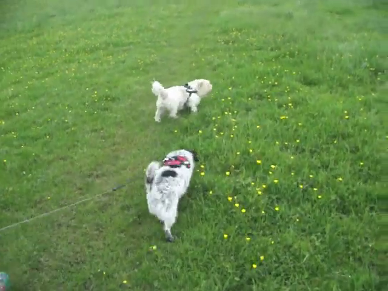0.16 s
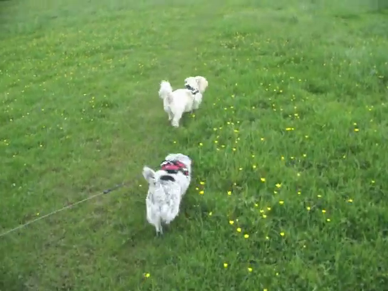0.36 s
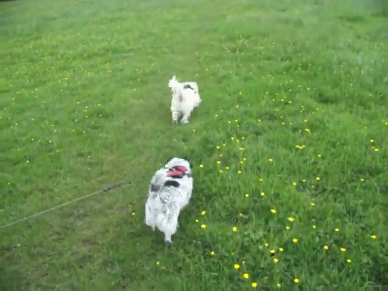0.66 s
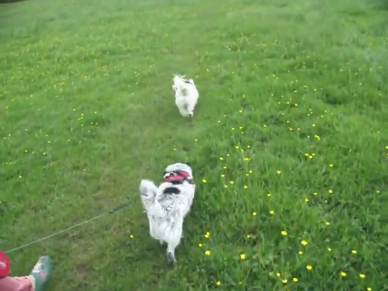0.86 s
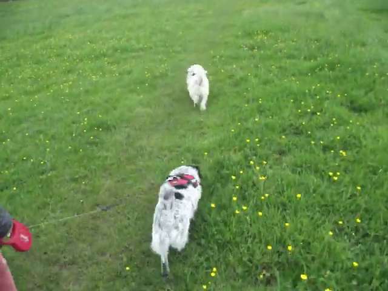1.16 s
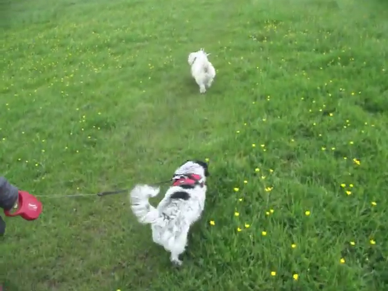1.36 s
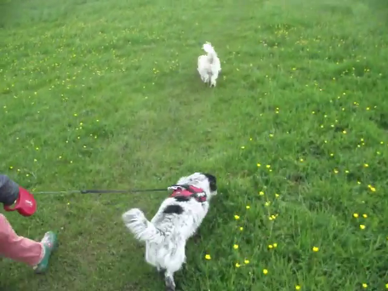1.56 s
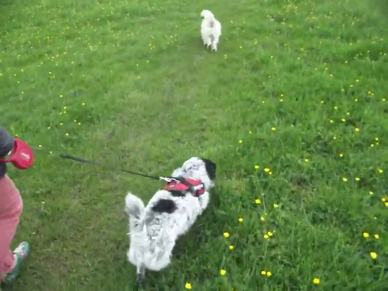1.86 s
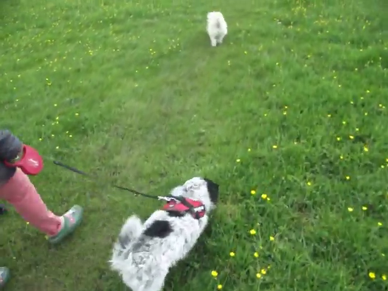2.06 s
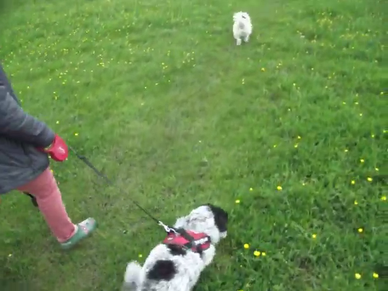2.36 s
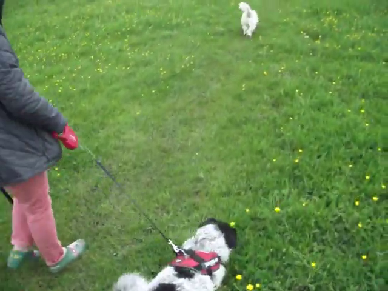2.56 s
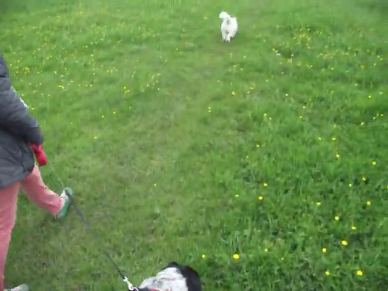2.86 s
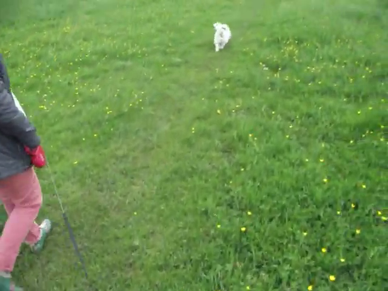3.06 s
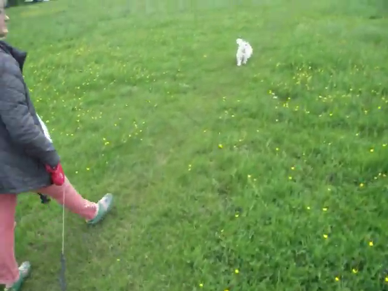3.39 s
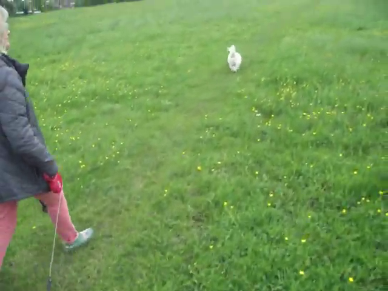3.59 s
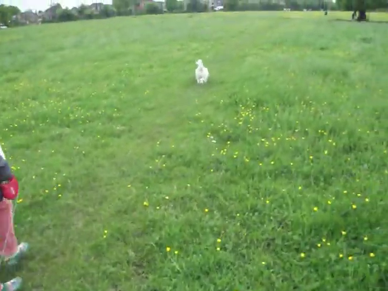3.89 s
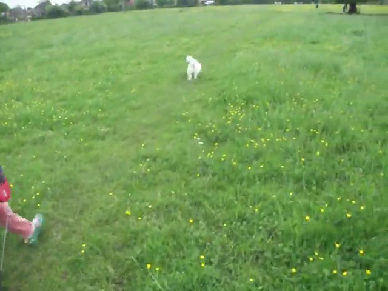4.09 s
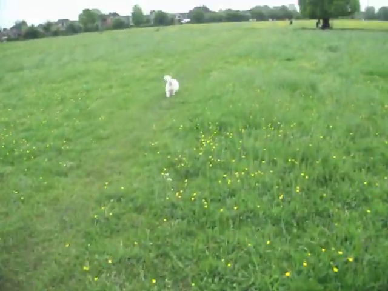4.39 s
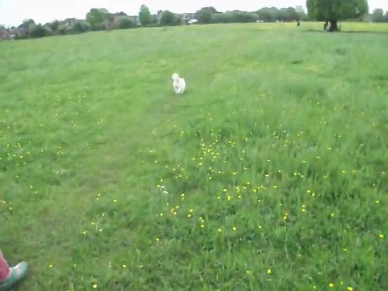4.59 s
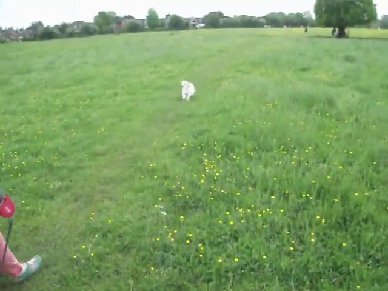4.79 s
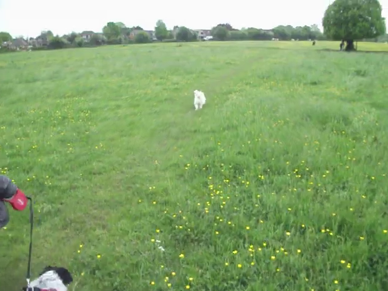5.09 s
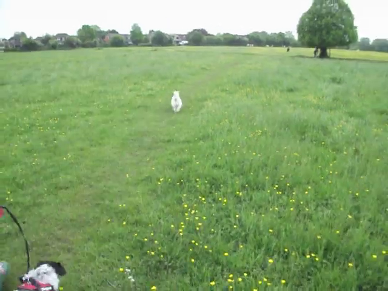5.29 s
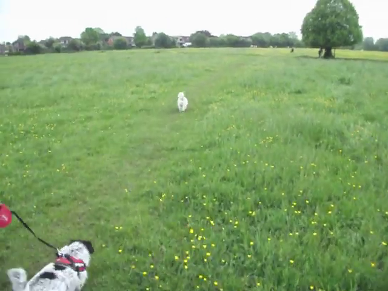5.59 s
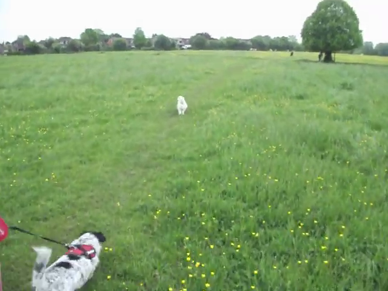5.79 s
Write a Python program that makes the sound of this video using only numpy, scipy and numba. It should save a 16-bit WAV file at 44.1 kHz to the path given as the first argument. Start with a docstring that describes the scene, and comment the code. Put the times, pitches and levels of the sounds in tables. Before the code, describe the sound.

A steady hiss with a faint whistle runs throughout, heard through a small hand-held microphone in an open field. Wind buffets it hard during the first second, with a low thump at about 0.3 seconds. A retractable leash reel gives a run of short, high, even creaks from 0.7 to 1.3 seconds. A sole scuffs at 1.5 seconds, and soft footfalls on grass come now and then. From 1.6 to 2.7 seconds the camera case rubs under the hand, with sharp, overloaded clicks, three dull knocks, a brief rumble and a few more creaks. Further rubs and two loud clicks come around 3.5 seconds. The reel creaks again from 3.7 to 4.9 seconds, with a quick flurry and a click near 4.1. Faint steps follow, and the low wind rumble swells again from about 5.6 seconds to the end.

```python
"""Wind buffets the microphone of a small hand-held camera on a walk with dogs across a grassy field.
Under the gusts a steady hiss whistles faintly in the microphone port; feet fall softly on the turf
and a sole scuffs once. A leash reel creaks once a turn, in short, even runs. Up close, the camera case
rubs and rumbles under the hand, takes a few dull knocks and gives clicks that overload the recorder."""
import sys
import numpy as np
from scipy import signal
from scipy.fft import rfft, irfft, next_fast_len
from scipy.io import wavfile
from scipy.ndimage import uniform_filter1d
from numba import njit

SR = 44100
rng = np.random.default_rng(int(sys.argv[2]) if len(sys.argv) > 2 else 0)


def int16_out(signal):
    """Quantize to a 16-bit WAV file."""
    q = np.round(np.clip(np.atleast_2d(signal).T, -1, 1) * 32767)
    wavfile.write(sys.argv[1], SR, q.astype(np.int16))


N = 261954
TIME = np.arange(N) / SR

# tone of the case when it is rubbed or rattles: freq_hz, gain_db
CASE_COLOUR = [(300, -31), (1000, -25.5), (1400, -18.5), (1750, -9.5), (2000, -8), (2550, 0.5), (2900, 0),
               (3300, -13.5), (3650, -20.5), (4200, -23.5), (5400, -47.5)]


def undb(db):
    """Decibels to gain."""
    return 10 ** (np.asarray(db) / 20)


def unit(x):
    """Scale to rms 1."""
    return x / np.sqrt(np.mean(x ** 2))


def add(out, start_s, sound):
    """Mix a sound in at its cue."""
    i = max(int(start_s * SR), 0)
    out[i:i + len(sound)] += sound[:max(N - i, 0)]


def colour(x, spectrum):
    """Equalise along (freq_hz, gain_db) points, rolling off an octave above the last."""
    hz, db = np.transpose(spectrum)
    size = next_fast_len(len(x))
    freqs = np.maximum(np.fft.rfftfreq(size, 1 / SR), 1)
    gain = undb(np.interp(np.log(freqs), np.log(hz), db)) / (1 + (freqs / (2 * hz[-1])) ** 4)
    return irfft(rfft(x, size) * gain, size)[:len(x)]


def noise(spectrum, count=N):
    """White noise coloured by (freq_hz, gain_db) points."""
    return colour(rng.standard_normal(count), spectrum)


def ring(push, modes):
    """Pass a push through parallel resonances (pitch_hz, width_hz, gain_db)."""
    return sum(undb(db) * signal.lfilter(*signal.iirpeak(hz, hz / width, fs=SR), push)
               for hz, width, db in modes)


def wander(rate_hz):
    """Smooth drift at rms 1: random levels, each held briefly, slewed twice."""
    hold = int(SR / rate_hz)
    levels = np.repeat(rng.standard_normal(N // hold + 1), hold)
    return unit(uniform_filter1d(uniform_filter1d(levels, hold), hold)[:N])


def slips(count, rate_hz, spread_db):
    """Friction: tiny slips of uneven size at random moments."""
    ticks = (rng.random(count) < rate_hz / SR) * rng.choice([-1, 1], count)
    return ticks * undb(spread_db * rng.standard_normal(count))


def steadied(x, span_s):
    """Even out the slow swells of a noise, leaving rms near 1."""
    return x / np.sqrt(uniform_filter1d(x ** 2, int(span_s * SR)) + np.mean(x ** 2) / 20)


def swishes(cues, spectrum, count=8192):
    """Grainy swells of friction, one for each (start_s, length_s, level_db)."""
    out = np.zeros(N)
    for start_s, length_s, db in cues:
        friction = slips(count, rate_hz=2100, spread_db=2)
        grain = unit(colour(friction, spectrum))[:int(length_s * SR)]
        add(out, start_s, grain * signal.windows.tukey(len(grain), .5) * undb(db))
    return out


def hiss(level_db=-31.33):
    """An even bed of air and grass, with a faint whistle from the microphone port."""
    # tone of the field's hiss: freq_hz, gain_db
    air_colour = [(100, 7), (300, 0.5), (550, 0), (900, 3), (1350, -0.5), (2000, 3), (2800, 6.5),
                  (3200, 7.5), (3600, -20), (4200, -59.5), (5400, -22.5), (6500, -25.5)]
    # resonances of the port: pitch_hz, width_hz, gain_db
    port_modes = [(1790, 104, 7.5), (2476, 134.5, 19)]
    whistle = ring(rng.standard_normal(N), port_modes)
    return unit(noise(air_colour) + whistle) * undb(level_db)


def wind_and_rumble():
    """Wind gusts and deep rumble swells, one from handling, over a wandering breeze; strong gusts also flutter."""
    # breeze between the gusts: time_s, level_db
    breeze = [(1.1, -35), (1.17, -39), (1.48, -33.5), (2.25, -35.5), (2.44, -29), (2.47, -34), (3.5, -39),
              (3.59, -34), (4.12, -39.5), (4.21, -32), (4.88, -42.5), (4.95, -32.5), (5.4, -39.5),
              (5.55, -39)]
    # low swells on the microphone, wind gusts and deep rumble swells, the one at 2.38 s from handling: #
    # crest_s, half_length_s, buffet_db, rumble_db
    swells = [(0.051, 0.024, -25, -28), (0.133, 0.027, -20, -24.5), (0.316, 0.078, -18, -19),
              (0.67, 0.02, -17.5, -16.5), (0.902, 0.09, -18.5, -17.5), (2.38, 0.068, -46.5, -23.5),
              (4.27, 0.023, -33, -53), (5.0, 0.03, -37, -27.5), (5.645, 0.11, -46, -20.5),
              (5.917, 0.049, -37, -12)]
    # tone of each layer, deepest first: freq_hz, gain_db
    rumble_colour = [(5, 4.5), (14, 2), (30, 2.5), (48, -4.5), (65, -13.5), (100, -32.5)]
    buffet_colour = [(35, -15.5), (58, 0.5), (80, 0), (110, -7.5), (150, -15), (220, -31.5), (400, -48)]
    flutter_colour = [(80, -15), (150, 8.5), (220, -3.5), (330, -15.5), (500, -28), (900, -37)]
    breeze_db = np.interp(TIME, *np.transpose(breeze)) + 1.5 * wander(rate_hz=12)
    buffet_gain, rumble_gain = undb(breeze_db - 2), undb(breeze_db + 8)
    for crest_s, half_s, buffet_db, rumble_db in swells:
        swell = np.exp(-((TIME - crest_s) / half_s) ** 2)
        buffet_gain += undb(buffet_db) * swell
        rumble_gain += undb(rumble_db) * swell
    rumble = steadied(noise(rumble_colour), span_s=0.076) * rumble_gain
    buffet = steadied(noise(buffet_colour), span_s=0.05) * buffet_gain
    flutter = steadied(noise(flutter_colour), span_s=0.13)
    drive_db = 20 * np.log10(buffet_gain)
    flutter_db = 1.57 * drive_db - 4.5 + 2 * wander(rate_hz=45)  # swells faster than the buffeting
    return rumble + buffet + flutter * undb(flutter_db)


def puffs():
    """A single eddy builds up pressure on the diaphragm, then flips to a suction that fades."""
    # hard puffs of wind: flip_s, level_db, build_s
    cues = [(0.123, -22, 0.017), (0.325, -8, 0.0013), (0.676, -18, 0.009), (2.429, -17.5, 0.0057),
            (3.694, -22, 0.017), (5.672, -14, 0.011)]
    out = np.zeros(N)
    for flip_s, db, build_s in cues:
        out += undb(db) * np.exp(-np.abs(TIME - flip_s) / build_s) * np.tanh((flip_s - TIME) / 0.001)
    return out


def footsteps():
    """Soles brush softly into the turf."""
    # footfalls: start_s, length_s, level_db
    cues = [(1.443, 0.027, -35), (1.93, 0.11, -37.5), (3.545, 0.041, -38.5), (3.88, 0.062, -40),
            (5.32, 0.031, -36.5), (5.63, 0.035, -36.5)]
    # muffled tone of turf: freq_hz, gain_db
    turf_colour = [(120, -18.5), (250, 0.5), (400, -3), (600, -12.5), (1200, -6.5), (2500, -20.5)]
    return swishes(cues, turf_colour)


def scuff(start_s, scrape_db, scrape_decay_s, hollow_db, hollow_decay_s, count=12000):
    """A sole's scrape dies away; its firm start rings two hollow resonances."""
    # tone of the scrape: freq_hz, gain_db
    scrape_colour = [(200, -19), (550, -13.5), (800, -12), (1100, -14), (1350, -12), (1560, -4.5),
                     (1900, -14.5), (2280, -2.5), (2600, -10), (3100, -11.5), (3600, -23.5), (5000, -51.5)]
    # hollow ring at its start: pitch_hz, width_hz, gain_per_pass_db
    hollow_modes = [(1570, 180, -1), (2220, 240, -7)]
    out, t = np.zeros(N), TIME[:count]
    push = slips(count, rate_hz=6000, spread_db=4)
    scrape = unit(colour(push, scrape_colour))
    scrape *= np.minimum(t / 0.013, 1) * np.exp(-t / scrape_decay_s)
    hollow = steadied(ring(ring(push, hollow_modes), hollow_modes), span_s=0.0099)
    hollow *= np.minimum(t / 0.0018, 1) * np.exp(-t / hollow_decay_s)
    add(out, start_s - .008, scrape * undb(scrape_db))  # the sole grazes just before it bites
    add(out, start_s, hollow * undb(hollow_db))
    return out


def rubs():
    """The hand slides on the case in short, grainy strokes."""
    # strokes: start_s, length_s, level_db
    cues = [(1.699, 0.078, -17), (1.732, 0.024, -11), (1.811, 0.078, -22.5), (2.282, 0.13, -27.5),
            (2.408, 0.027, -26.5), (2.62, 0.058, -27), (3.328, 0.054, -23.5), (3.418, 0.039, -28.5),
            (3.505, 0.052, -27.5)]
    return swishes(cues, CASE_COLOUR)


def knocks(count=2048):
    """Soft bumps ring the low modes of the camera body."""
    # bumps: start_s, peak_db, contact_s
    cues = [(2.109, -9.5, 0.00026), (2.3988, -3.5, 0.00022), (2.6339, -6, 0.00022)]
    # body modes: pitch_hz, width_hz, gain_db
    body_modes = [(203, 320, 3), (403, 56, 0), (730, 120, 5), (1180, 78, 6.5)]
    out, t = np.zeros(N), TIME[:count]
    for start_s, db, contact_s in cues:
        thud = ring(t * np.exp(-t / contact_s), body_modes)
        add(out, start_s, -thud / np.abs(thud).max() * undb(db))
    return out


def reel_runs(turn_s=0.0825, lag_s=0.022, settle=0.33, length_s=0.013):
    """Creak cues from a leash reel unwinding: one a turn, slow at first, then at an even beat."""
    # runs of the reel: start_s, count, first_force_db, last_force_db
    runs = [(0.729, 7, -14.5, -14.5), (1.672, 3, -12, -24), (3.691, 4, -16, -15.5), (4.399, 6, -10, -16.5)]
    cues = []
    for start_s, count, first_db, last_db in runs:
        for k, force_db in enumerate(np.linspace(first_db, last_db, round(count))):
            cues.append((start_s, force_db, length_s))
            start_s += turn_s + lag_s * settle ** k
    return cues


def creaks(pitch_hz=2816, sag_hz_per_db=19, count=2048):
    """Each creak is a swell of quick slips: one wavering mode sings over a dry rasp."""
    # firm accents, a quick flurry and a few single creaks: start_s, force_db, length_s
    accents = [(0.022, -16, 0.022), (0.693, -12, 0.002), (1.942, -5.5, 0.013), (1.969, -15.5, 0.026),
               (3.957, -5.5, 0.0097), (3.996, -9, 0.011), (4.027, -7.5, 0.013), (4.061, -3, 0.014),
               (4.079, -16, 0.012), (4.107, -8.5, 0.016), (4.5038, -5, 0.0085)]
    # dry edge of a creak: freq_hz, gain_db
    rasp_colour = [(500, -30), (1300, -12), (1750, -3.5), (2000, -10.5), (2500, 6.5), (3350, -2.5),
                   (3650, -12), (4200, -13), (5400, -18.5)]
    out, t = np.zeros(N), TIME[:count]
    for start_s, force_db, length_s in reel_runs() + accents:
        hz = pitch_hz - sag_hz_per_db * force_db  # the firmer the creak, the lower it sings
        swell = np.sin(np.pi * np.minimum(t / length_s, 1)) * np.exp(-.8 * t / length_s)
        band = [(.75 * hz, -40), (.92 * hz, -3), (hz, 0), (1.08 * hz, -3), (1.22 * hz, -40)]
        mode = noise(band, count)
        mode /= np.sqrt(np.average(mode ** 2, weights=swell ** 2))
        rasp = unit(colour(slips(count, rate_hz=7600, spread_db=1.5), rasp_colour))
        # firm creaks sing, light ones are mostly rasp
        add(out, start_s, swell * (undb(force_db - 6.5) * mode + undb(0.35 * force_db - 16.5) * rasp))
    return out


def clicks(count=2048):
    """A snap cracks and briefly rings the case; a weak rattle trails it."""
    # snaps on the case: start_s, level_db, pitch_hz, t60_s
    cues = [(1.602, -9.5, 2630, 0.0095), (1.729, 4, 2790, 0.005), (1.7394, 2.5, 2690, 0.009),
            (1.7483, -7, 2540, 0.007), (1.76, -2.5, 2550, 0.0064), (1.8254, -9, 2550, 0.0061),
            (2.109, 6, 2490, 0.0038), (2.245, -5, 2660, 0.0054), (2.3305, 9.5, 2690, 0.02),
            (2.3728, 3, 2750, 0.0062), (2.3975, 4.5, 2255, 0.0095), (2.484, 2, 2660, 0.0068),
            (2.5063, -6, 2680, 0.013), (2.6584, -3, 2630, 0.0065), (3.4536, 10, 2710, 0.0085),
            (3.5393, 8, 2475, 0.0056), (4.0971, 3, 2744, 0.015), (4.4504, -7.5, 2770, 0.016),
            (5.687, -9.5, 2700, 0.012)]
    # first instant of a click: freq_hz, gain_db
    crack_colour = [(200, -24), (600, -16.5), (1200, -1), (2000, 4), (4000, -2.5), (5400, -9)]
    out, t = np.zeros(N), TIME[:count]
    for start_s, db, hz, t60_s in cues:
        envelope = np.exp(-np.log(1000) * t / t60_s) * (1 - np.exp(-t / 0.00077))
        tone = np.sin(2 * np.pi * hz * t) * envelope / envelope.max()
        crack = noise(crack_colour, count) * np.exp(-t / 0.0015)
        rattle = unit(noise(CASE_COLOUR, count)) * np.exp(-t / 0.0046)
        add(out, start_s, undb(db) * (tone + undb(-14) * crack + undb(-16.5) * rattle))
    return out


def scene():
    """Wind, field, feet, leash and handling meet at the one microphone."""
    close_up = creaks() + clicks() + rubs() + knocks()
    feet = footsteps()
    feet += scuff(1.502, scrape_db=-19, scrape_decay_s=0.072, hollow_db=-17.5, hollow_decay_s=0.024)
    return (wind_and_rumble() + puffs() + hiss() + close_up + feet)[None]


@njit
def follow(x, attack, release):
    """The limiter's envelope: it rises fast and falls slowly."""
    out, level = np.empty(len(x)), 0.
    for i in range(len(x)):
        level += (abs(x[i]) - level) * (attack if abs(x[i]) > level else release)
        out[i] = level
    return out


def record(dry, band_hz=5550, top_hz=16200,
           threshold_db=-8, attack_s=0.00064, release_s=0.021, lag_s=.0014):
    """A narrow-band input with a late limiter: loud clicks clip, and the hiss ducks after them."""
    # treble cut that softens the buzz of clipping: freq_hz, gain_db
    treble_cut = [(5200, 0), (6300, -7), (8200, -11), (11000, -4.5), (16000, -13.5)]
    x = signal.sosfilt(signal.ellip(8, .2, 80, band_hz, fs=SR, output="sos"), dry[0])
    envelope = follow(x, 1 / (attack_s * SR), 1 / (release_s * SR))
    late_envelope = np.interp(TIME - lag_s, TIME, envelope)
    limited = x / np.maximum(late_envelope / undb(threshold_db), 1)
    clipped = limited / (1 + (limited / .73) ** 12) ** (1 / 12)  # flat tops, slightly rounded knee
    softened = colour(clipped, treble_cut)
    return signal.fftconvolve(softened, signal.firwin(255, top_hz, fs=SR), "same")[None]


dry = scene()
out = record(dry)
int16_out(out)
```